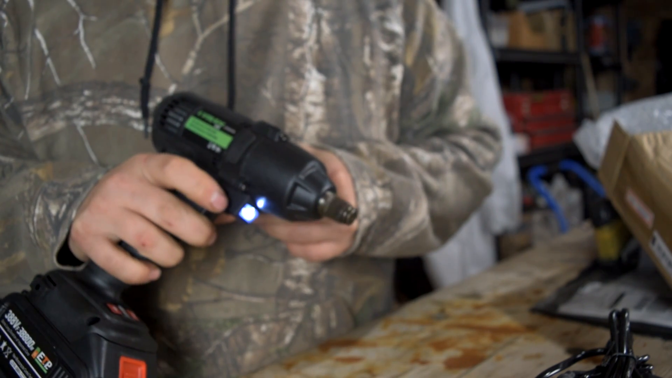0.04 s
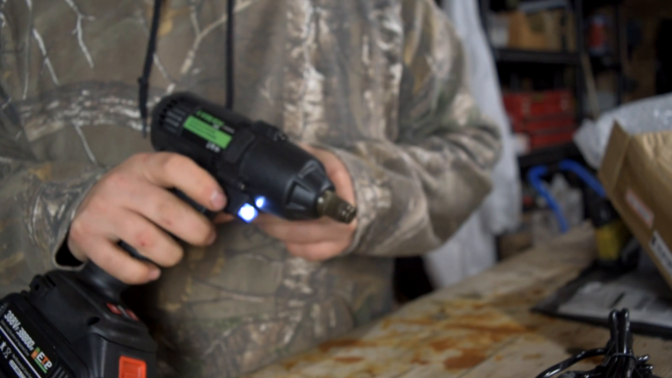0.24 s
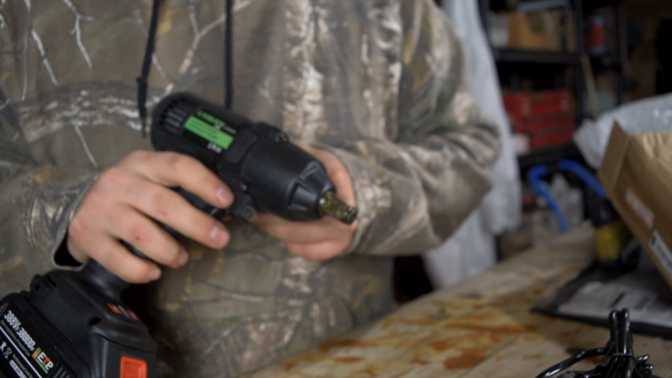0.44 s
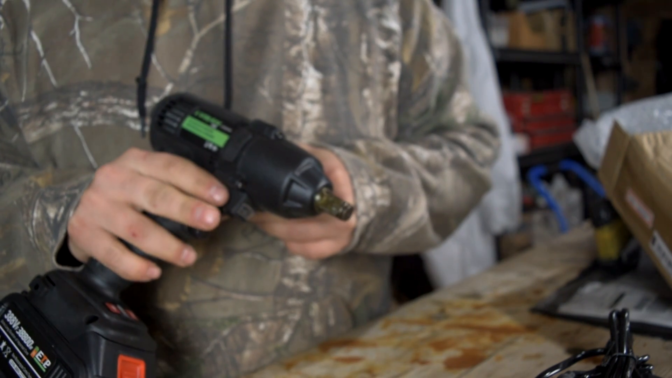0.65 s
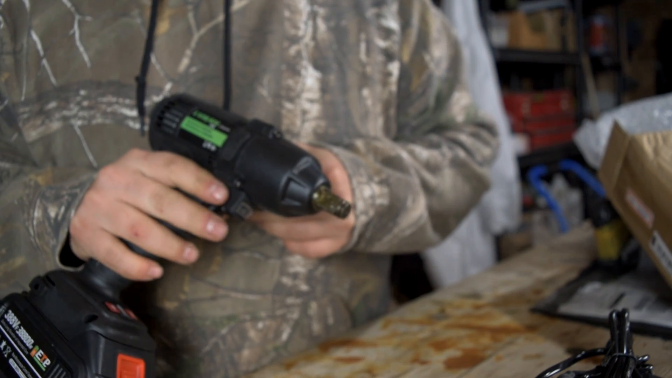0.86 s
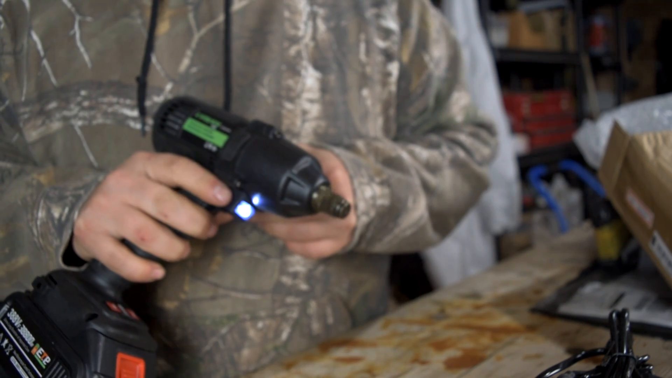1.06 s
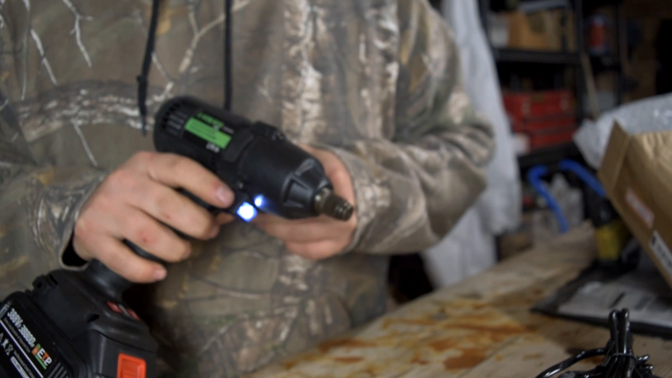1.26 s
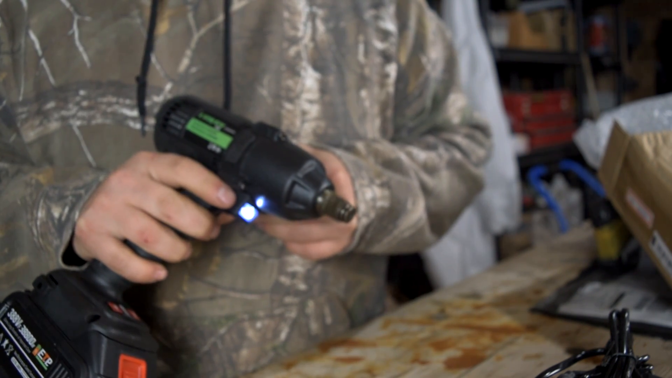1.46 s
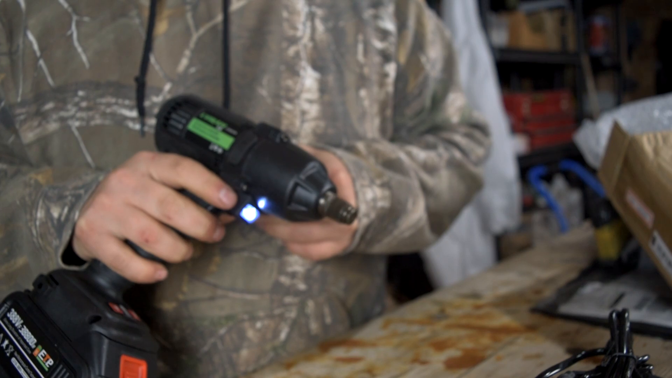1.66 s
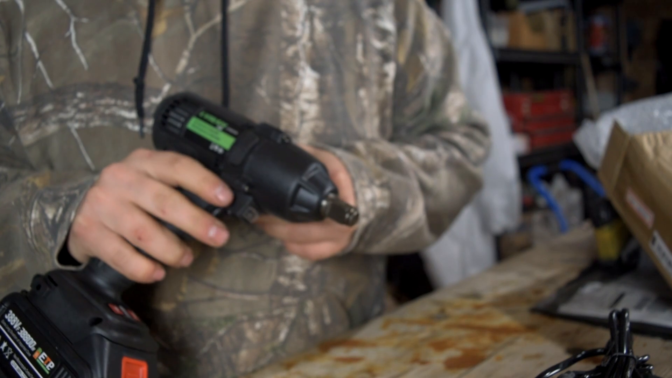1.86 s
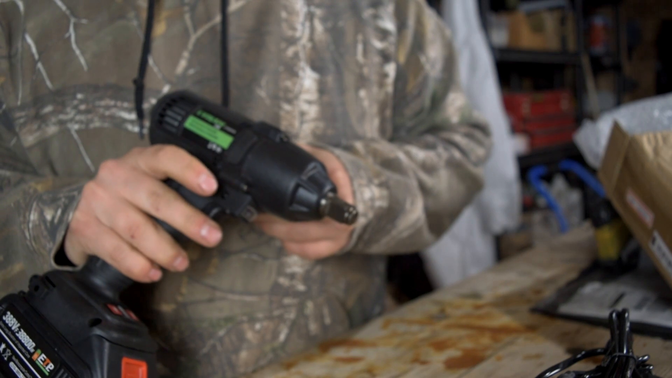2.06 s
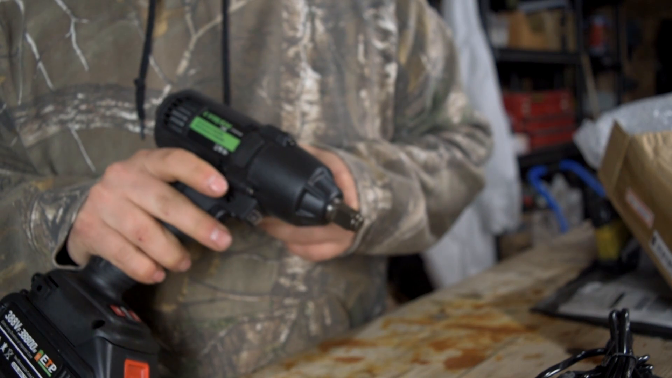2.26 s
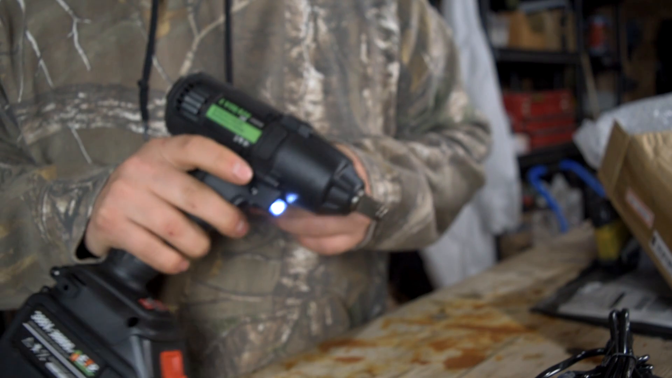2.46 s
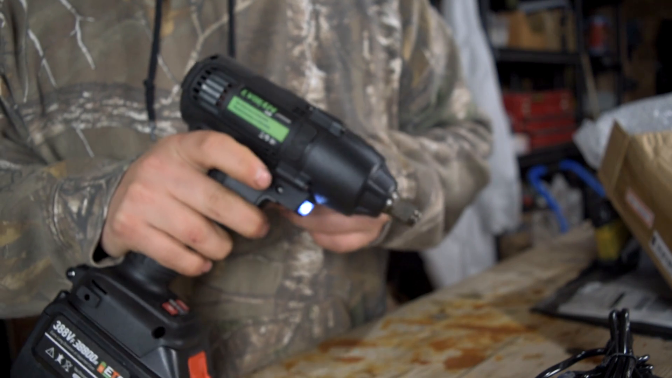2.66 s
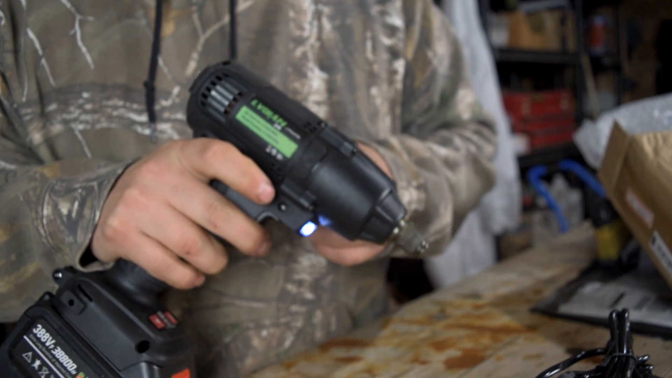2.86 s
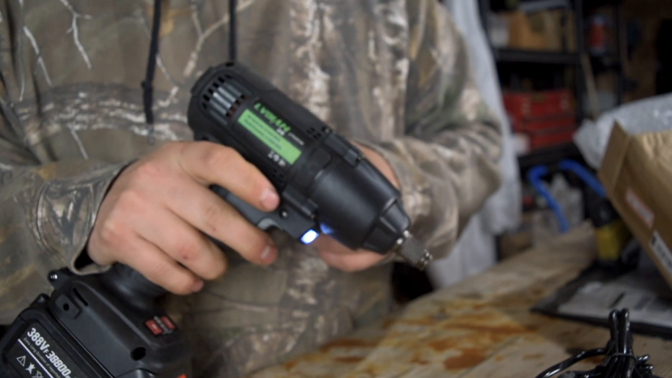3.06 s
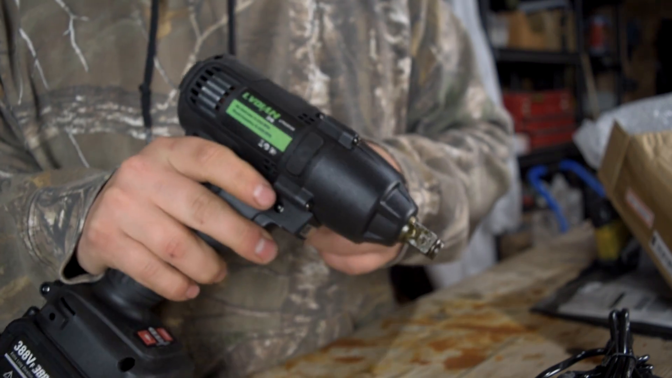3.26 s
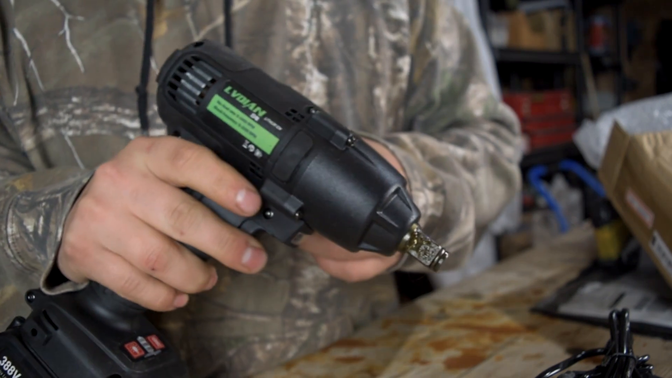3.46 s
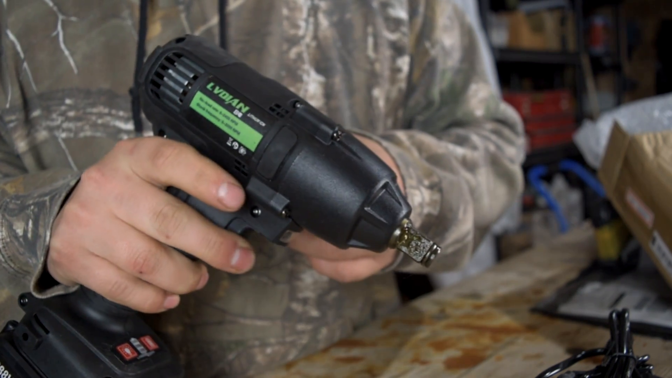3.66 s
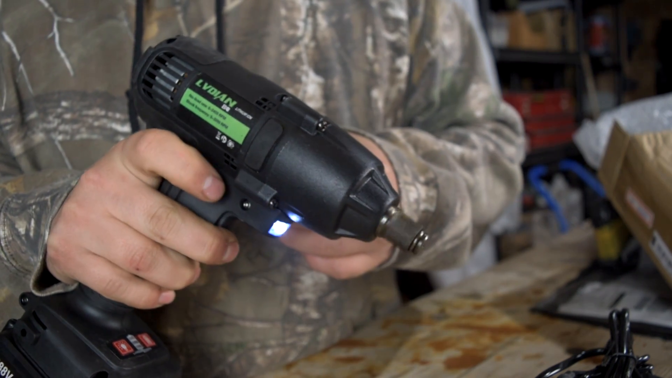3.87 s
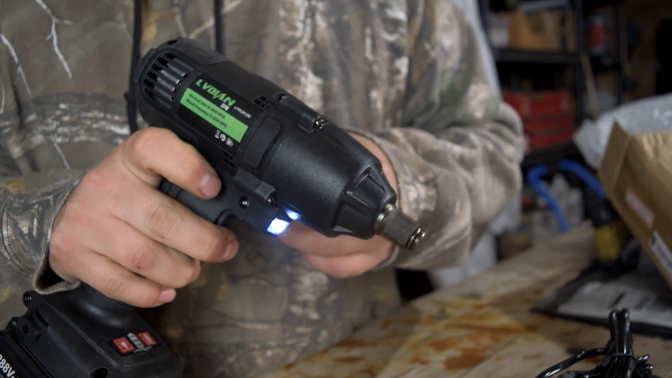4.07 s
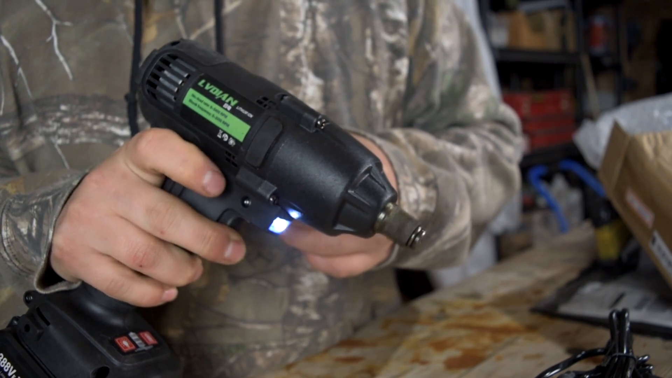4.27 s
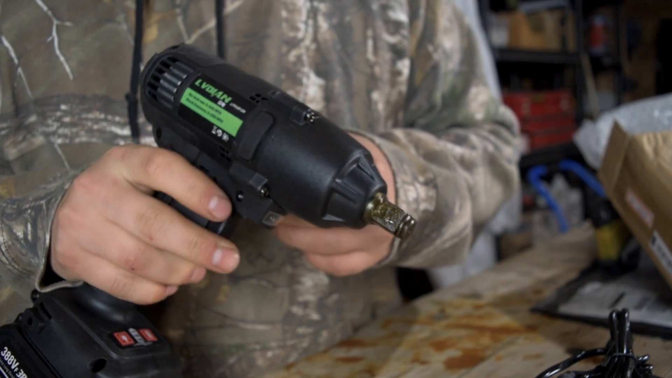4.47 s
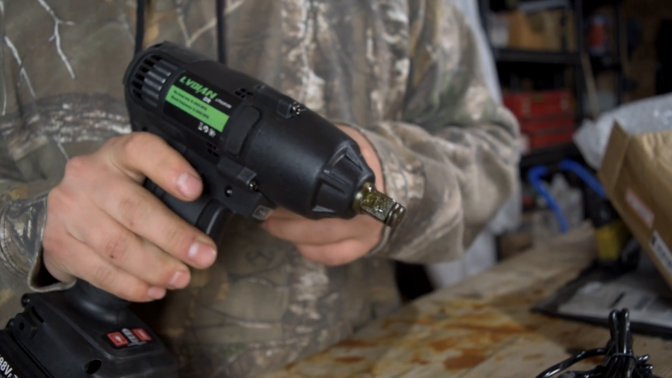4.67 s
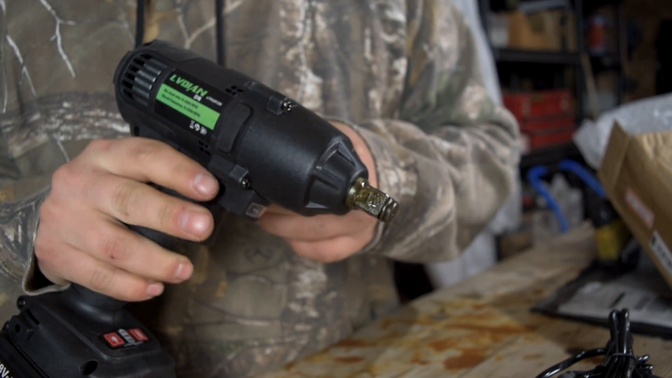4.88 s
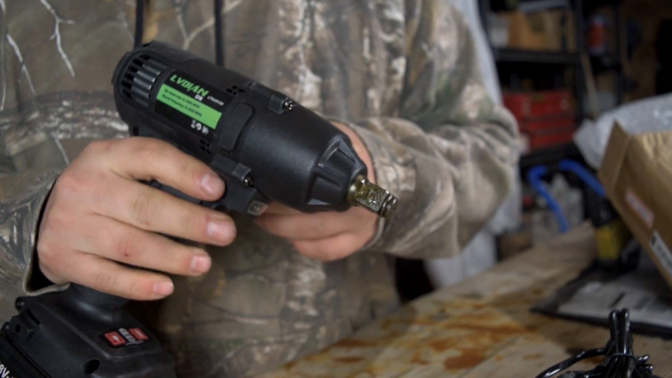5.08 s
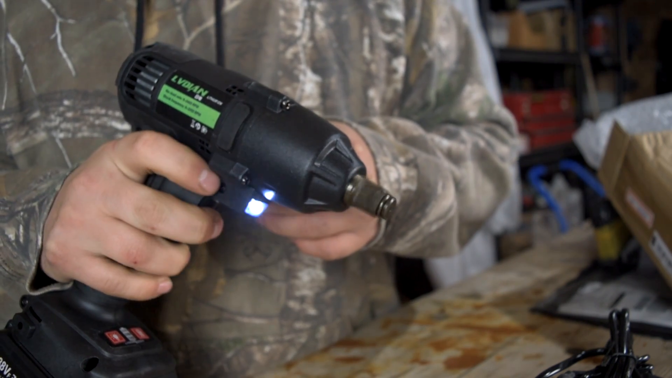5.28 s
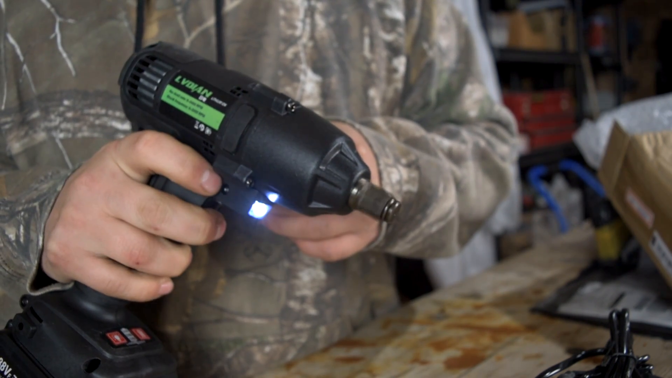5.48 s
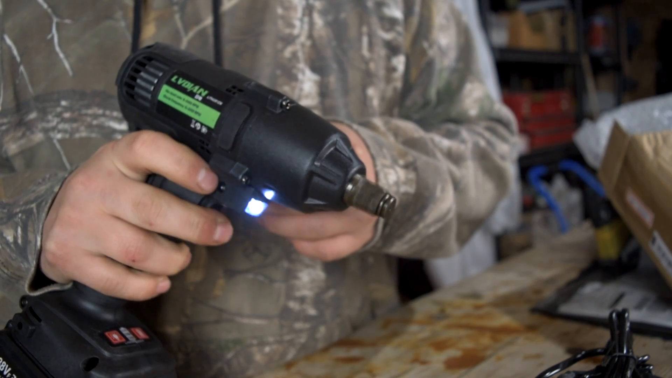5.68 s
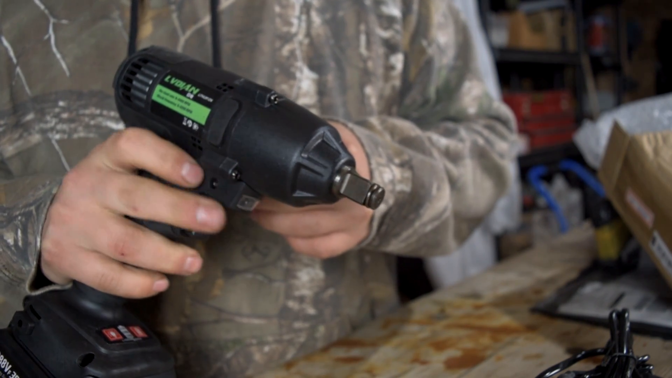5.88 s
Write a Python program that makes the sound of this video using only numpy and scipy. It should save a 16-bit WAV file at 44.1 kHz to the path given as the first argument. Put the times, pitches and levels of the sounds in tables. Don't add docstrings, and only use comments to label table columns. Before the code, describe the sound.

Close geared motor whine brakes to a stop, then four more brief trigger pulls rev and drop amid switch clicks and cloth rustle.

```python
import sys
import numpy as np
from scipy import signal
from scipy.fft import rfft, irfft, next_fast_len
from scipy.io import wavfile
from scipy.ndimage import uniform_filter1d

SR = 44100
rng = np.random.default_rng(int(sys.argv[2]) if len(sys.argv) > 2 else 0)


def transcribe(signal):
    frames = np.atleast_2d(signal).T
    limited = np.clip(frames, -1, 1)
    pcm = np.round(limited * 32767).astype(np.int16)
    wavfile.write(sys.argv[1], SR, pcm)


def decibels_to_gain(level_db):
    exponent = np.asarray(level_db, float) / 20
    return 10 ** exponent


N = 261513
T = np.arange(N) / SR
SUN_TURNS = 1 + 50 / 7


# trigger, hammer clack and release in seconds, top motor speed in Hz.
RUN_TIMES = [
    (-.3, -.2, .355, 228.5),
    (.98, 1.056, 1.735, 236),
    (2.45, 2.547, 2.89, 229),
    (3.735, 3.91, 4.265, 232),
    (5.195, 5.249, 5.69, 239.3),
]
PLANET_THROB_DB = 2.5


def driver():
    run = np.searchsorted([row[0] for row in RUN_TIMES[1:]], T)
    speed = motor_speed(run)
    level_db, hiss_db = effort(run)
    motor = 2 * np.pi * np.cumsum(speed) / SR
    slack = np.sqrt(np.clip(1 - speed / 222, 0, 1))
    slowing = np.gradient(speed) < 0

    throb_db = PLANET_THROB_DB * slack * slowing * (np.cos(3 * motor / SUN_TURNS) - .3)
    chopped = (np.gradient(speed) > 0) * np.clip(1 - speed / 180, 0, 1)
    loose_db = -4 * slack - 30 * uniform_filter1d(chopped, size=400)
    gears = decibels_to_gain(0.5 + loose_db) * np.clip(speed / 50, 0, 1) * gear_tones(speed, motor, run, slack)

    sunk_db = slack * np.where(slowing, -25, -3)
    whine = decibels_to_gain(-2 - 5 * slack) * armature_tones(speed, motor, run, sunk_db)
    sparks_db = -2.5 + hiss_db + 2.0 * np.cos(motor) + 1.1 * slow(40)
    sparks = decibels_to_gain(sparks_db) * coloured(rng.standard_normal(N), brush_db)
    gearbox = decibels_to_gain(throb_db) * (gears + rattle(speed, motor, slack))
    return decibels_to_gain(level_db) * (gearbox + whine + sparks)


# start in seconds, motor speed then in Hz, quick rise in seconds,
# speed still to gain in Hz, slow settling in seconds.
FULL_CURRENT = [(-.2, 150, .025, 33, .13), (1.058, 149, .028, 17.5, .6), (2.575, 108.6, .024, 30, .115),
                (3.885, 141, .02, 36, .125), (5.248, 149, .025, 30, .1)]
# time constant in seconds, bend as an exponent, gears silent at in seconds.
SLOWING_DOWN = [(.083, 1.9, .414), (.122, 1.35, 1.822), (.187, 1.23, 3.168), (.097, 2.2, 4.325),
                (.108, 2.1, 5.762)]


def motor_speed(run):
    trigger, clack, release, top = np.array(RUN_TIMES)[run].T
    full, first, rise, lag, settle = np.array(FULL_CURRENT)[run].T
    brake, bend = np.array(SLOWING_DOWN)[run].T[:2]
    since = np.clip(np.minimum(T, release) - full, 0, None)
    pulled = top - lag * np.exp(-since / settle) - (top - lag - first) * np.exp(-since / rise)
    wound = np.clip((T - trigger) / (full - trigger), 0, 1)
    return wound * pulled * np.exp(-(np.clip(T - release, 0, None) / brake) ** bend)


# first level in dB, swell bend as an exponent, level at the clack in dB,
# hush after it in dB, brush hiss in dB over the gearbox.
START_NOISE = [(-40, 1.1, -9, -14, -13), (-51, 1.34, -2, -14, -11.5), (-38, 1.27, -11.5, -10, -11),
               (-40.5, .35, -6.5, 0, -11), (-29.5, 1.7, -3, -25.5, -11)]
# held level in dB, last level before silence in dB, sag while braking in dB.
HELD_NOISE = [(-13, -13, -0.9), (-13.5, -16.5, 0.6), (-13, -24, 0.5), (-13.5, -11.5, -1.5),
              (-12.5, -9.5, -3)]
HUSH_S, HUSH_HOLD_S, SURGE_S, SURGE_END_S, SURGE_DB = 0.0027, 0.022, 0.038, 0.078, 3
FADE_DB_PER_S, HISS_FADE_DB_PER_S = 616, 350
HISS_IN_HUSH, HISS_CHOPPED_DB, HISS_BRAKING_DB = 0.65, -5.5, 0.5


def effort(run):
    trigger, clack, release, top = np.array(RUN_TIMES)[run].T
    first_db, bend, clack_db, hush_db, hiss_db = np.array(START_NOISE)[run].T
    silent = np.array(SLOWING_DOWN)[run, 2]
    held_db, last_db, sag_db = np.array(HELD_NOISE)[run].T

    swell = np.clip((T - trigger) / (clack - trigger), 0, 1) ** bend
    after = T - clack
    hush = hush_db * np.interp(after, [0, HUSH_S, HUSH_HOLD_S, SURGE_S], [0, 0.47, 1.0, 0.0073])
    surge = SURGE_DB * np.interp(after, [HUSH_HOLD_S, SURGE_S, SURGE_END_S], [0, 1, 0])
    settled = (held_db - clack_db) * np.clip(after / HUSH_S, 0, 1)
    braked = np.clip((T - release) / (silent - release), 0, 1)
    gone_s = np.clip(T - silent, 0, None)

    level = first_db + (clack_db - first_db) * swell + settled + hush + surge
    level = level + (last_db - held_db) * braked + sag_db * np.sin(np.pi * braked)
    level = level - FADE_DB_PER_S * gone_s
    hiss = hiss_db - HISS_IN_HUSH * hush + HISS_CHOPPED_DB * (1 - swell)
    hiss = hiss + HISS_BRAKING_DB * (T > release) - HISS_FADE_DB_PER_S * gone_s
    return uniform_filter1d(level, size=100), uniform_filter1d(hiss, size=100)


MESH_CYCLES = [48, 51, 96, 99, 102, 144, 147, 150]
MESH_DB = [(-14, -17, -12, -10, -12), (-8, -10, -7, -4, -9), (-24, -19, -22, -22, -20),
           (-6, -6, -7, -8, -8), (-9, -10, -10, -18, -12), (-33, -27, -24, -30, -27),
           (-28, -23, -16, -30, -26), (-11, -11, -14, -15, -13)]
RUN_OUT_DB = [-9, -7, -12, -12, -6]
RUN_OUT_FELT = [.2, .25, 1, 1, 1, .3, .3, .45]
FIRST_MESH_PULLED_DB = -14


def gear_tones(speed, motor, run, slack):
    carrier, out = motor / SUN_TURNS, 0
    sides = np.exp(-1j * motor) + 0.15 * np.exp(1j * motor) + 0.16 * np.exp(-3j * motor)
    wobble = decibels_to_gain(np.array(RUN_OUT_DB)[run]) * sides
    chatter = [slow(41) for k in range(4)]
    near_top = np.where(np.gradient(speed) > 0, 1, np.clip(speed / 80 - 1.5, 0, .7))
    for k, (order, levels_db) in enumerate(zip(MESH_CYCLES, MESH_DB)):
        hz = order / SUN_TURNS
        passing_db = .45 * (housing_db(hz * speed) - housing_db(hz * 228)) - slack * order / 45
        pulled_db = FIRST_MESH_PULLED_DB * slack * near_top * (order < 60)
        level_db = np.array(levels_db)[run] + pulled_db + passing_db
        gain = decibels_to_gain(level_db + 1.4 * slow(16.5) + 6.5 * slack * chatter[k % 4])
        angle = order * carrier + k * k + (0.22 + 1.55 * slack) * chatter[(k + 1) % 4]
        out = out + gain * np.real((1 + RUN_OUT_FELT[k] * wobble) * np.exp(1j * angle))
    return np.sqrt(2) * out


def rattle(speed, motor, slack):
    carrier = motor / SUN_TURNS
    skirts = sum(decibels_to_gain(db) * slow(width_hz) * np.sin(50 * k * carrier)
                 for k, db, width_hz in [(1, -9.0, 157), (2, -11.0, 164), (3, -16.5, 160)])
    bunch_db = (0.2 + 0.25 * slack) * (1.95 * np.cos(3 * carrier + 1.0 * slow(5)) + 3.0 * slow(70))
    blows = rng.standard_normal(N) * decibels_to_gain(2.1 * np.minimum(rng.exponential(1, N), 6.0))
    knocks = decibels_to_gain(-4.5 + bunch_db) * coloured(blows, housing_db)
    growl = decibels_to_gain(-7.0 + 2.5 * slow(40)) * slack ** 2 * band(290, 910)
    return growl + skirts * np.clip(speed / 200, 0, 1) ** 2 + knocks


# frequency in Hz, density in dB per Hz.
HOUSING_COLOUR = [(120, -50.5), (200, -10), (512, -6.5), (616, -6), (818, -7), (943, -6.5), (1350, 2),
                  (1950, 0), (3540, 5), (4510, -8), (6000, -20), (7800, -53), (13200, -120)]
# frequency in Hz, width in Hz, height in dB.
SHELL_MODES = [(812, 170, 9), (2406, 320, 3.5), (2770, 170, 3.5), (3480, 620, -1)]


def housing_db(hz):
    return at_hz(HOUSING_COLOUR, hz) + sum(resonance_db(hz, *mode) for mode in SHELL_MODES)


ARMATURE_CYCLES = [1, 3, 15, 20, 28, 29, 30, 31, 32, 33, 35, 36, 38, 40, 49, 50]
ARMATURE_DB = [(-27.5, -23.5, -28.5, -19.5, -20.5), (-30, -52, -26.5, -33.5, -23),
               (-40, -34.5, -36, -33, -19), (-57, -29.5, -36, -34, -25), (-31, -32, -38, -35, -35),
               (-31, -27, -22, -33, -39.5), (-28, -29.5, -31, -23, -24.5), (-31, -39, -28, -39, -22),
               (-28, -42, -42, -38, -26), (-30, -37, -35.5, -34, -34), (-33, -33, -17.5, -22, -29),
               (-37, -30, -31.5, -38, -19), (-25.5, -29, -35, -44, -35), (-37, -28, -32, -25, -24),
               (-36, -28.5, -52, -44, -37), (-36, -38, -30, -33, -34)]
COWL_SHARE = .8


def armature_tones(speed, motor, run, sunk_db):
    waver, out = [slow(4.5) for k in range(4)], 0
    for k, (order, db) in enumerate(zip(ARMATURE_CYCLES, ARMATURE_DB)):
        passing_db = COWL_SHARE * (brush_db(order * speed) - brush_db(order * 228)) * (order > 25)
        level_db = np.array(db)[run] + 2.5 * waver[k % 4] * (order > 1) + sunk_db * (order > 4)
        out = out + decibels_to_gain(level_db + passing_db) * np.sin(order * motor + k * k)
    return np.sqrt(2) * out


# frequency in Hz, density in dB per Hz.
BRUSH_COLOUR = [(2940, -29), (5000, -9.5), (5920, -10.5), (7350, 4), (8610, -2), (10400, -8), (11300, -9.5),
                (12500, -17), (15000, -19.5), (15800, -38.5)]
# frequency in Hz, width in Hz, height in dB.
COWL_MODE = (7190, 640, 4.3)


def brush_db(hz):
    return at_hz(BRUSH_COLOUR, hz) + resonance_db(hz, *COWL_MODE)


# start in seconds, end in seconds, level in dB.
WHISTLES = [
    (1.003, 1.027, -53),
    (2.405, 2.538, -36),
    (3.72, 3.864, -34),
    (5.193, 5.23, -52),
]
# multiple of the chopper pitch, level in dB.
WHISTLE_PARTIALS = [(1, 0), (2, -17), (3, -27), (4, -31)]
CHOPPER_HZ = 3538


def chopper():
    gate = sum(decibels_to_gain(db) * np.clip((T - a) / .002, 0, 1) * np.clip((b - T) / .015, 0, 1) for a, b, db in WHISTLES)
    turning = sum(np.clip((T - a) / (b - a), 0, 1) ** 2 * (T < b) for a, b, db in WHISTLES)
    blur = (0.4 + 1.3 * turning) * slow(84)
    angle = 2 * np.pi * CHOPPER_HZ * T + blur
    tone = sum(decibels_to_gain(db) * np.sin(k * angle) for k, db in WHISTLE_PARTIALS)
    rough_db = 1.5 * slow(25) + (1 + 5 * turning) * slow(150) + 8.0 * turning
    return np.sqrt(2) * gate * tone * decibels_to_gain(rough_db)


# time in seconds, peak in dB, lows in dB relative to it,
# highs in dB relative to it, length in ms.
CONTACTS = [(0.4898, -23.5, -10, -18, 2.4), (0.605, -10, -9.5, -3.5, 2.3), (0.689, -11, -5.5, -6, 1.86),
            (0.866, -36.5, -15, -14.5, 1.8), (0.9871, -16, -14, -28, 0.58), (1.0075, -28, -19, -8, 0.97),
            (1.0572, 7, -31, 2, 0.96), (1.993, -25.5, -24, -15, 1.4), (2.0112, -9, -13.5, -3.5, 2.7),
            (2.121, 0, -13, -6, 1.85), (2.407, -30, -9, -5, 2.2), (2.5485, 12.5, -20, -29, 0.56),
            (3.2862, -30, 7, 2, 0.96), (3.722, -22, -10, -4, 1.7), (4.3222, 0.5, -13, -21, 2.2),
            (4.565, -25.5, -10.5, -32, 3.9), (4.763, -41, 3, -16, 1.5), (4.8203, -13.5, -18, -21, 1.54),
            (4.839, -25, -13, -20, 1.3), (4.9115, -1.5, -12.5, -4, 2), (4.9585, 1, -13.5, 1.5, 2.12),
            (5.1089, -25.5, -7.5, -13, 2.5), (5.1926, -13, -17, -8.5, 2.2),
            (5.249, 22.5, -27.5, -4.5, 0.45)]
# low edge in Hz, high edge in Hz, ringing mode in Hz, its level in dB, its t60 in seconds.
CLICK_PARTS = [
    (283, 1380, 1028, -30.5, 0.031),
    (1910, 4140, 1400, -28, 0.0029),
    (4970, 8130, 9000, -16, 0.00057),
]


def clicks():
    contacts = rng.standard_normal((len(CONTACTS), 3, 900))
    after = np.arange(900) / SR
    out = np.zeros(N)
    for part, (low_hz, high_hz, mode_hz, mode_db, t60) in enumerate(CLICK_PARTS):
        blows = np.zeros(N + 900)
        for (s, db, low_db, high_db, ms), draw in zip(CONTACTS, contacts[:, part]):
            span = after / (0.00078 * max(ms, .5) * [1.8, 1, .8][part])
            gain = decibels_to_gain(db + [low_db + 11.5, 3, high_db][part])
            blows[round(s * SR) - 20:][:900] += gain * span * np.exp(1 - span) * np.tanh(0.86 * draw)
        sos = signal.butter(2, [low_hz, high_hz], "band", fs=SR, output="sos")
        bare = signal.sosfilt(sos, blows[:N] + 1e-18)
        out += bare + decibels_to_gain(mode_db) * ring(blows[:N], mode_hz, t60)
    return out


# centre in seconds, length in seconds, level in dB.
CLOTH = [
    (.9, 0.22, -66),
    (1.913, .08, -46),
    (2.423, 0.056, -35),
    (3.213, 0.12, -28),
    (3.65, .15, -49),
    (4.45, .15, -51),
    (4.95, 0.46, -41),
    (5.845, .05, -37),
]


def rustle():
    return swells(*np.transpose(CLOTH)) * decibels_to_gain(-14.0 + 3.9 * slow(30)) * band(1100, 3580)


# centre in seconds, length in seconds, sway in dB, mount ring in dB, buffet in dB.
STAND_JOLTS = [(0.132, 0.23, -36, -34.5, -53), (0.445, 0.026, -24, -36, -34), (0.7, 0.045, -19, -36, -49),
               (1.053, 0.048, -23.5, -37, -31), (1.254, 0.017, -34.5, -49, -49),
               (1.562, 0.18, -37.5, -38, -52), (1.858, 0.059, -24.5, -32, -38),
               (2.17, 0.078, -20.5, -25.5, -39), (2.525, 0.061, -20, -21, -23),
               (2.812, 0.065, -31, -19.5, -25.5), (2.961, 0.058, -23.5, -14, -25.5),
               (3.243, 0.065, -21.5, -9, -15), (3.363, 0.047, -21.5, -5, -25),
               (3.493, 0.081, -26, -21, -35.5), (3.793, .05, -46, -30.5, -39),
               (3.912, 0.034, -32, -36, -35), (4.35, 0.056, -29, -33.5, -34),
               (4.597, 0.15, -27.5, -50, -67), (4.982, 0.047, -26, -31.5, -40),
               (5.221, 0.023, -56.5, -29, -29.5), (5.416, 0.21, -31, -34.5, -45),
               (5.828, 0.052, -24, -30.5, -43)]
SWAY_LONGER_S, BUFFET_SHORTER = 0.084, 0.77
CALM_SWAY_DB, CALM_RING_DB, CALM_BUFFET_DB = -44, -43, -46.5


def stand():
    s, length, sway_db, ring_db, buffet_db = np.transpose(STAND_JOLTS)
    sway = np.sin(2 * np.pi * np.cumsum(19 + 6.9 * slow(8.5)) / SR) + 0.11 * band(34, 43.8)
    angle = 2 * np.pi * np.cumsum(57 + 3.5 * slow(5.3)) / SR
    mount = np.sin(angle) + 0.12 * np.sin(2 * angle)
    buffet = band(57, 170.0) + 0.32 * band(170, 705)
    sway = sway * (decibels_to_gain(CALM_SWAY_DB) + swells(s, length + SWAY_LONGER_S, sway_db))
    mount = mount * (decibels_to_gain(CALM_RING_DB) + swells(s, length, ring_db))
    buffet = buffet * (decibels_to_gain(CALM_BUFFET_DB) + swells(s, BUFFET_SHORTER * length, buffet_db))
    return np.sqrt(2) * (sway + mount) + buffet


# frequency in Hz, density in dB per Hz.
SHOP_COLOUR = [(88, -49), (150, -49), (226, -2), (413, -12.5), (455, -10), (502, -10), (850, -7),
               (1120, -4.5), (1380, -8), (1500, -3), (2430, -25), (14600, -34), (15800, -32)]
SHOP_DB = -44


def shop_hum():
    return decibels_to_gain(SHOP_DB + 0.4 * slow(18)) * coloured(rng.standard_normal(N), lambda hz: at_hz(SHOP_COLOUR, hz))


def workshop(x, t60, wet_db):
    after = np.arange(SR // 2) / SR
    tail = rng.standard_normal(len(after)) * decibels_to_gain(-60 * after / t60) * np.clip((after - .008) / 0.0005, 0, 1)
    tail = signal.lfilter([1], [1, -.7], tail)
    return x + decibels_to_gain(wet_db) * signal.fftconvolve(x, tail / np.sqrt(np.sum(tail ** 2)))[:N]


def at_hz(points, hz):
    points_hz, points_db = np.array(points).T
    return np.interp(np.log(np.maximum(hz, 1)), np.log(points_hz), points_db)


def resonance_db(hz, top_hz, width_hz, db):
    return db / (1 + (2 * (hz - top_hz) / width_hz) ** 2)


def rms_one(x):
    return x / np.sqrt(np.mean(x ** 2) + 1e-20)


def slow(rate_hz):
    r = np.exp(-2 * np.pi * rate_hz / SR)
    return rms_one(signal.lfilter([1], [1, -2 * r, r * r], rng.standard_normal(N + SR))[SR:])


def band(low_hz, high_hz):
    sos = signal.butter(3, [low_hz, high_hz], "band", fs=SR, output="sos")
    return rms_one(signal.sosfilt(sos, rng.standard_normal(N + SR))[SR:])


def coloured(x, colour_db):
    size = next_fast_len(N)
    hz = np.arange(size // 2 + 1) * SR / size
    return rms_one(irfft(rfft(x, size) * decibels_to_gain(colour_db(hz)), size)[:N])


def ring(clicks, hz, t60):
    r, w = decibels_to_gain(-60 / (t60 * SR)), 2 * np.pi * hz / SR
    return signal.lfilter([0, np.sin(w)], [1, -2 * r * np.cos(w), r * r], clicks + 1e-18)


def swells(s, length_s, db):
    return sum(decibels_to_gain(d) * np.exp(-((T - a) / max(w, .005)) ** 2) for a, w, d in zip(s, length_s, db))


def scene():
    tool = workshop(driver() + chopper(), t60=0.18, wet_db=-19.5)
    switches = workshop(clicks(), t60=0.25, wet_db=-19.0)
    return (tool + switches + rustle() + stand() + shop_hum())[None]


def top_cut(x):
    return signal.sosfilt(signal.butter(12, 16010, fs=SR, output="sos"), x)


def record(dry):
    flat = np.clip(dry, -.99, .99)
    dull = signal.sosfilt(signal.cheby2(12, 50, 16500, fs=SR, output="sos"), flat)
    return top_cut(dull)


dry = scene()
out = record(dry)
transcribe(out)
```